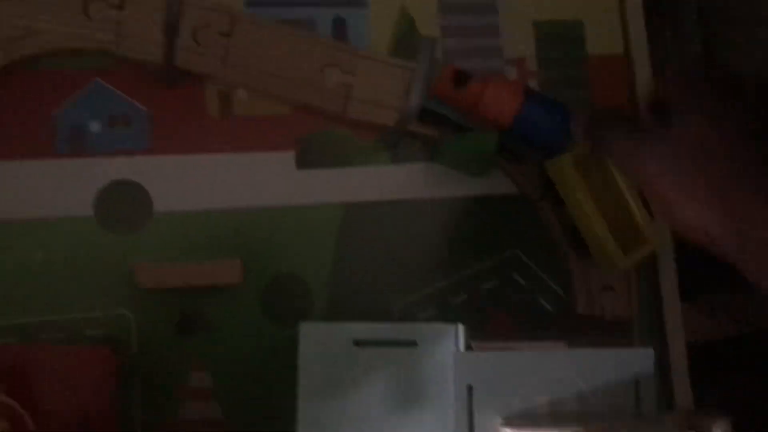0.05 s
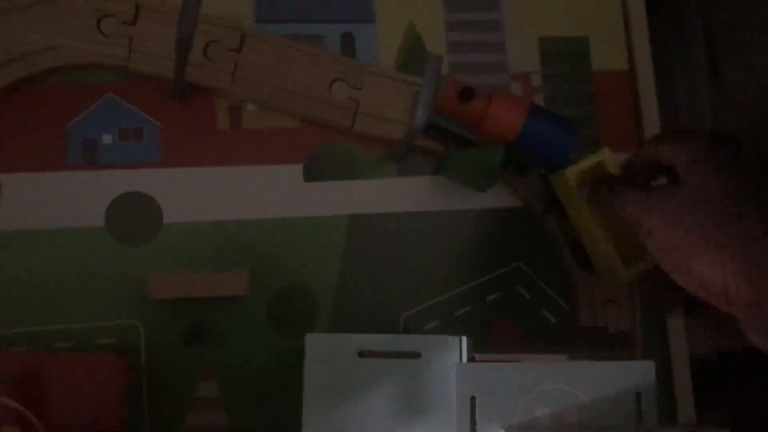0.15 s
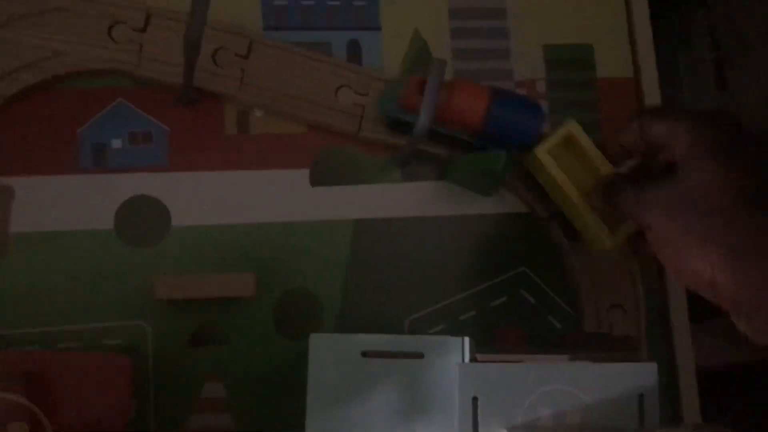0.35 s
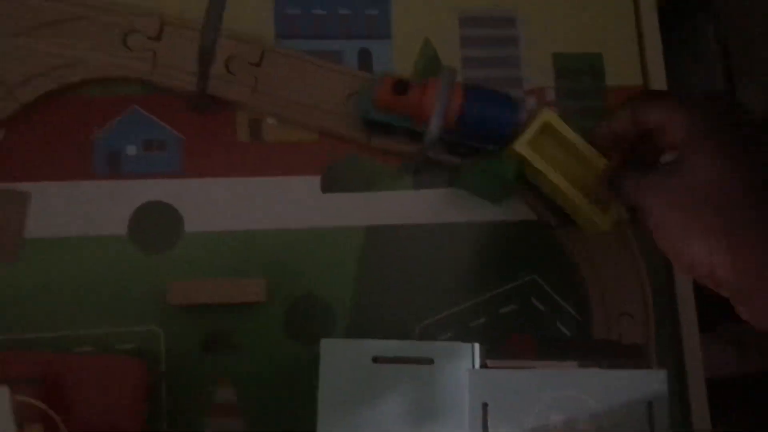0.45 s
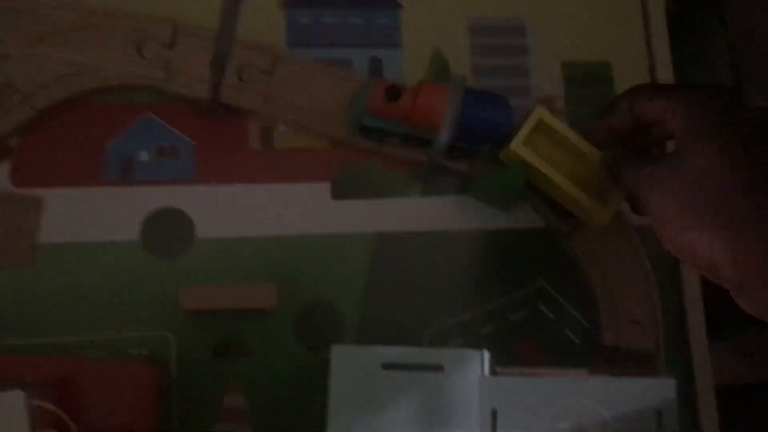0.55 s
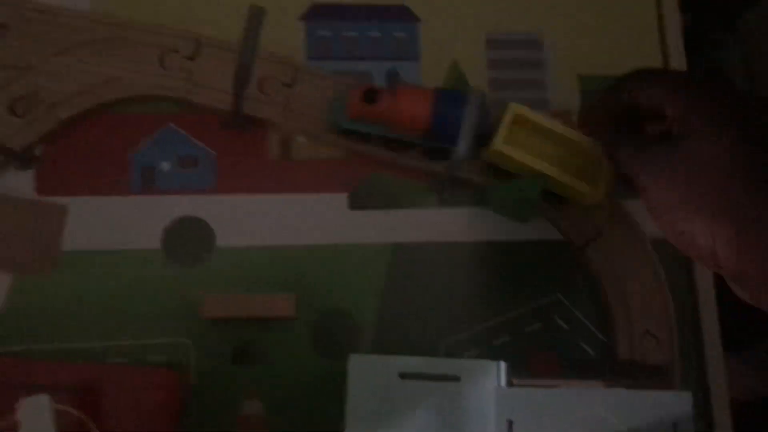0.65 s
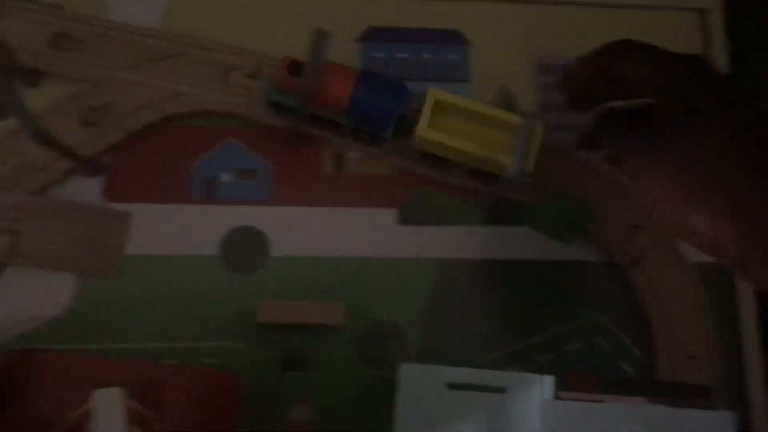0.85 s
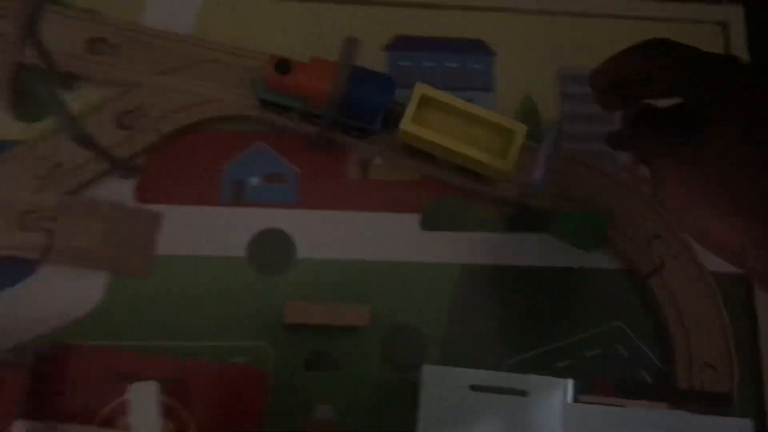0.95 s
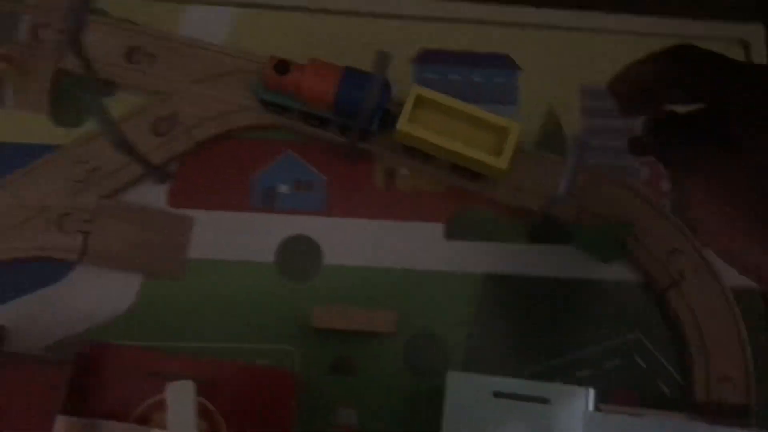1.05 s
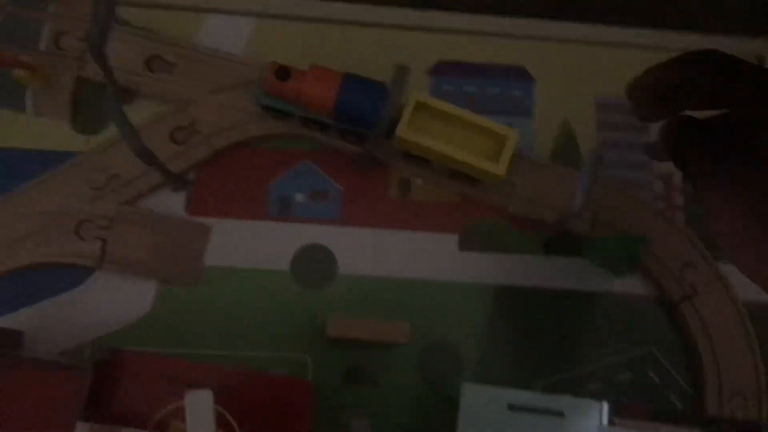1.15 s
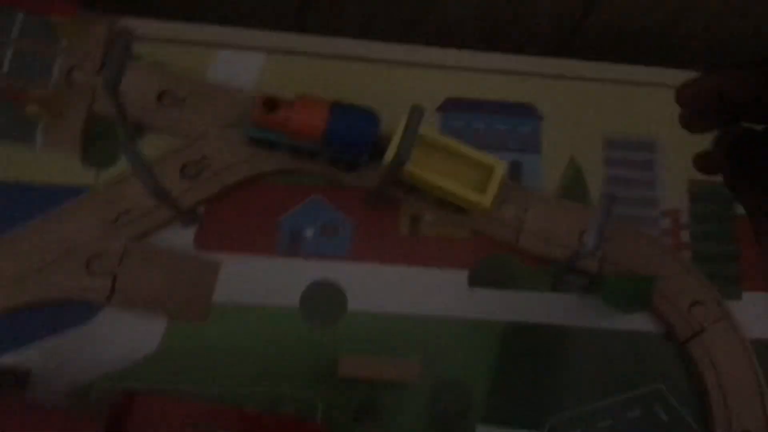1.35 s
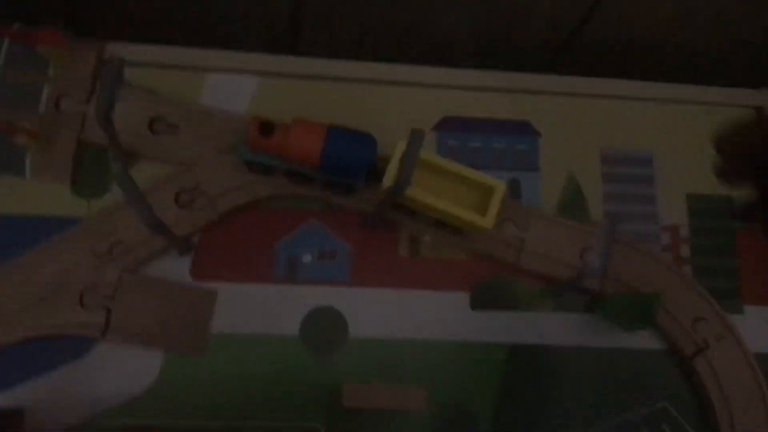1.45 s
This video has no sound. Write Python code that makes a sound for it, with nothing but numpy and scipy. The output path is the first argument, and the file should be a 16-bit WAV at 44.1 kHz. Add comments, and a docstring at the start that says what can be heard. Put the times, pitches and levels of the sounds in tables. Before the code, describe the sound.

A toy train rolls over wooden track in a small quiet room. It starts at 0.2 seconds with a sharp plastic click and a hollow clack, then the wheels rumble and grind softly, knocking again around 0.4. The rolling builds to its loudest clatter of wooden clacks and coupling clicks from 0.7 to 0.95. It coasts more quietly, clacks lightly near 1.25 and fades with a faint tick at 1.45.

```python
"""Toy train on wooden track

A hand pushes a toy engine and its wagon round a bend on a play table, then lets them coast.
Surface roughness excites the wheels, which grind over the grain and make the table top drum.
Impacts at the joints ring the modes of track and table; jerks of the coupling ring the two plastic cars.
A small quiet room adds a short reverberation."""
import sys
import numpy as np
from scipy import signal
from scipy.fft import rfft, irfft
from scipy.io import wavfile
from scipy.ndimage import map_coordinates

SR = 44100
rng = np.random.default_rng(int(sys.argv[2]) if len(sys.argv) > 2 else 0)


def file_out(sig):
    """Save sig as 16-bit WAV at sys.argv[1]."""
    # one column per channel
    cols = np.atleast_2d(sig).T
    # limit, then scale
    lim = np.clip(cols, -1, 1)
    pcm = np.round(lim * 32767).astype(np.int16)
    wavfile.write(sys.argv[1], SR, pcm)


N = 66150
TIME_S = np.arange(N) / SR


def undb(db):
    """Amplitude ratio of a level in decibels."""
    return 10 ** (np.asarray(db) / 20)


def unit_rms(x):
    """Normalisation to a mean power of 1."""
    return x / np.sqrt(np.mean(x ** 2))


def unit_energy(x):
    """Normalisation to a total energy of 1."""
    return x / np.sqrt(np.sum(x ** 2))


def envelope(rows, column=1):
    """Gain over time, interpolated in decibels from one column of a table."""
    rows = np.array(rows)
    return undb(np.interp(TIME_S, rows[:, 0], rows[:, column]))


def decay(t60_s):
    """Exponential damping: 60 dB lost in t60_s."""
    return np.exp(-np.log(1000) * np.arange(4096) / (SR * t60_s))


def low_cut(x, hz):
    """Fourth-order Butterworth high-pass."""
    return signal.sosfilt(signal.butter(4, hz, "high", fs=SR, output="sos"), x)


def colour(x, spectrum, size=4096):
    """Minimum-phase filtering through (frequency_hz, gain_db) points."""
    hz, db = np.array(spectrum).T
    bins_hz = np.maximum(np.arange(size // 2 + 1) * SR / size, 1)
    gain = undb(np.interp(np.log(bins_hz), np.log(hz), db))
    cepstrum = irfft(np.log(gain))
    cepstrum[1:size // 2] *= 2
    cepstrum[size // 2 + 1:] = 0
    return signal.fftconvolve(x, irfft(np.exp(rfft(cepstrum))))[:len(x)]


def ring(modes, detune=.01, scatter_db=0.9):
    """Modal superposition: a struck body sounds as damped sines, slightly different at each blow."""
    out = 0
    for hz, t60_s, db in modes:
        tuning, strength, polarity = rng.standard_normal(3)
        env = decay(t60_s)
        wave = np.sin(2 * np.pi * hz * (1 + detune * tuning) * np.arange(len(env)) / SR)
        out = out + np.sign(polarity) * undb(db + scatter_db * strength) * unit_energy(env * wave)
    return unit_energy(out)


def burst(spectrum, t60_s=0.033, crack_energy=.03):
    """Impact transient: an impulse, then modes so dense that they act as decaying noise."""
    env = decay(t60_s)
    x = unit_energy(env * rng.standard_normal(len(env)))
    x[0] += np.sqrt(crack_energy)
    return unit_energy(colour(x, spectrum))


def add_hit(out, start_s, hit, reference_s=.005):
    """Superposition of one hit, scaled so that its level is its energy spread over reference_s."""
    i = int(start_s * SR)
    out[i:i + len(hit)] += hit[:max(N - i, 0)] * np.sqrt(reference_s * SR)


def bumps(per_s, spread_db):
    """Poisson process: tiny random contacts of uneven strength."""
    contact = rng.random(N) < per_s / SR
    polarity = rng.choice([-1, 1], N)
    return contact * polarity * undb(spread_db * np.minimum(rng.exponential(size=N), 4))


def grains(spectrum):
    """Incoherent summation: the powers of many brief contacts add into a patter of noise."""
    contacts = bumps(per_s=1000, spread_db=3.0)
    power = signal.fftconvolve(contacts ** 2, decay(t60_s=0.0089) ** 2)[:N]
    patter = np.sqrt(np.abs(power)) * rng.standard_normal(N)
    return unit_rms(colour(patter, spectrum))


# Spectrum of the room air: frequency_hz, gain_db
AIR_SPECTRUM = [(20, -13), (55, 3.5), (100, -8.5), (200, -15), (500, -14), (1200, -30), (4000, -28.5),
                (8000, -35.5), (10500, -36.5), (13000, -33), (16000, -42.5)]
# Faint hiss as the cars coast: time_s, level_db
HISS_LEVELS = [(1.05, -94), (1.13, -63), (1.23, -62.5), (1.33, -76), (1.42, -75)]


def background():
    """Filtered noise: a steady floor of room air and a faint passing hiss."""
    air = undb(-61) * unit_rms(colour(rng.standard_normal(N), AIR_SPECTRUM))
    hiss = colour(rng.standard_normal(N), [(1000, -25), (5000, -0.5), (9000, -0.5), (14000, -1.5)])
    return air + unit_rms(hiss) * envelope(HISS_LEVELS)


def room(x, build_s=0.0032, crossover_hz=4000):
    """Diffuse reverberation: reflections build quickly and decay exponentially, weaker in the treble."""
    out, t = x, np.arange(SR // 2) / SR
    for band, t60_s, db in (("low", .19, -11), ("high", .2, -18.5)):
        env = np.exp(-np.log(1000) * t / t60_s) * (1 - np.exp(-t / build_s))
        reflections = unit_energy(env * rng.standard_normal(len(t)))
        tail = signal.lfilter(*signal.butter(2, crossover_hz, band, fs=SR), reflections)
        out = out + undb(db) * signal.fftconvolve(x, tail)[:N]
    return out


# Spectrum of the airy brushing sound: frequency_hz, gain_db
BRUSH_SPECTRUM = [(3000, -18), (7000, -8), (10000, -6), (12500, 3), (16000, -3)]


def brush(start_s=1.4415, t60_s=0.15, level_db=-53.5):
    """Friction noise: a soft, high puff dies away after the last tick."""
    t = TIME_S - start_s
    env = (t > 0) * np.exp(-np.log(1000) * np.abs(t) / t60_s)
    return undb(level_db) * env * unit_rms(colour(rng.standard_normal(N), BRUSH_SPECTRUM))


def scrape(centre_s=0.86, sigma_s=0.026, pitch_hz=14800, bandwidth_hz=400, level_db=-52):
    """Friction drives a narrow resonance: an axle rubs briefly as the wagon rattles over a joint."""
    resonance = signal.iirpeak(pitch_hz, pitch_hz / bandwidth_hz, fs=SR)
    rub = signal.lfilter(*resonance, bumps(per_s=4000, spread_db=2))
    swell = np.exp(-((TIME_S - centre_s) / sigma_s) ** 2 / 2)
    return undb(level_db) * unit_rms(rub) * swell


# Strength of the three rolling noises: time_s, rumble_db, grind_db, rasp_db
ROLL_LEVELS = [(0, -67.5, -71.5, -92), (.18, -68.5, -78, -90), (.205, -42, -50.5, -70),
               (.33, -43.5, -58.5, -70), (.41, -40.5, -54.5, -66.5), (.48, -38.5, -43.5, -48.5),
               (.53, -43, -58.5, -69.5), (.59, -39, -47.5, -58), (.65, -33, -44.5, -50),
               (.70, -35.5, -45, -56), (.76, -34, -39, -46), (.80, -49, -41.5, -48), (.85, -33, -39.5, -47),
               (.93, -33, -45.5, -58), (.99, -37, -50.5, -57), (1.06, -43.5, -68, -74.5),
               (1.10, -40, -49.5, -58.5), (1.15, -44, -71.5, -69), (1.19, -41, -52.5, -60.5),
               (1.22, -44.5, -64, -66), (1.28, -40, -47, -67), (1.35, -55, -73, -73),
               (1.5, -70.5, -68, -78)]
# Spectra of the table's rumble (before its pitch shift) and of the wheels' low grind and fine rasp:
# frequency_hz, gain_db
RUMBLE_SPECTRUM = [(25, -58.5), (65, -18.5), (105, -15), (145, -1), (180, 0), (215, -5.5), (260, -9.5),
                   (320, -15.5), (420, -24), (600, -26.5), (1500, -35.5), (5000, -103)]
GRIND_SPECTRUM = [(40, -38), (150, -14), (330, 0), (560, 3), (950, 0.5), (1400, 2.5), (2000, 0),
                  (2600, -12.5), (4000, -21), (8000, -33)]
RASP_SPECTRUM = [(1000, -29), (2200, -5), (3100, 1), (3700, -1.5), (4400, -8), (6000, -7.5), (7500, -16),
                 (11000, -22.5), (16000, -24)]
# Modes of the table top, also struck by the knocks: frequency_hz, t60_s, relative_db
TABLE_MODES = [(72, .05, -4.5), (131.5, 0.057, -0.5), (181.7, 0.053, 0.5), (245.6, 0.052, -5),
               (322, 0.039, -10.5), (437, 0.01, -20)]


def rolling(unshifted_db=-38, octaves_per_db=0.0487):
    """Roughness excitation: wheels grind over the grain and drum the table, higher when rolling harder."""
    drive = colour(bumps(per_s=1500, spread_db=2.5), RUMBLE_SPECTRUM)
    resonance = signal.fftconvolve(drive, ring(TABLE_MODES))[:N]
    rumble = unit_rms(drive) + undb(-9) * unit_rms(resonance)
    force = envelope(ROLL_LEVELS, column=1)
    pitch_ratio = 2 ** (octaves_per_db * (20 * np.log10(force) - unshifted_db))
    rumble = map_coordinates(rumble, [np.cumsum(pitch_ratio)], order=1, mode="mirror")
    rumble = unit_rms(low_cut(rumble, hz=122)) * force
    grind = grains(GRIND_SPECTRUM) * envelope(ROLL_LEVELS, column=2)
    rasp = grains(RASP_SPECTRUM) * envelope(ROLL_LEVELS, column=3)
    return rumble + grind + rasp


# Jerks of the coupling on each car: start_s, engine_drive_db, wagon_drive_db
COUPLING_JERKS = [(0.069, -58.5, -59), (.2010, -39, -55), (0.2068, -28.5, -30.5), (.2088, -18.5, -52),
                  (.4010, -59.5, -59), (0.43, -57, -43), (.4370, -54, -29.5), (0.4447, -32.5, -26),
                  (.4472, -56, -24.5), (.6055, -66.5, -53), (0.685, -71, -70), (0.7138, -63, -58),
                  (0.7415, -60, -33.5), (.8183, -43, -36), (0.8277, -28, -31), (0.8296, -29.5, -48),
                  (0.8388, -41, -42), (0.854, -41, -38), (.8615, -51, -43), (0.882, -49, -53),
                  (0.8906, -36.5, -29), (.9497, -45, -56.5), (1.2620, -51, -54), (1.2735, -47, -35.5),
                  (1.2848, -49, -52), (1.4417, -54, -55.5)]
# Modes of the two plastic shells: frequency_hz, t60_s, relative_db
ENGINE_MODES = [(2050, 0.043, -5.5), (4160, .016, -7), (5140, 0.006, -8.5), (5530, .012, -4),
                (6046, .015, -1.5), (8670, .011, -9), (10050, .011, 1), (11020, .011, 0.5),
                (11310, .009, 0), (12800, 0.0019, -3), (15000, .008, -6.5)]
WAGON_MODES = [(4750, .02, -8), (4840, .016, -4), (5360, 0.032, -8), (5620, .016, -4), (8330, 0.022, 2),
               (9050, 0.014, 4.5), (9450, .016, 2.5), (11150, .01, -24), (13700, .006, -6),
               (14700, .01, -7)]
# Spectrum of the coupling's snap: frequency_hz, gain_db
SNAP_SPECTRUM = [(500, -5), (2000, -2), (3400, -6), (5500, 7.5), (7300, -0.5), (10000, -2), (12500, -1),
                 (16000, -12)]


def coupling_clicks(shell_gain_db=-5, snap_gain_db=-8.5):
    """Free vibration after an impulse: the coupling snaps and both plastic shells ring."""
    out = np.zeros(N)
    for start_s, engine_drive_db, wagon_drive_db in COUPLING_JERKS:
        engine, wagon = undb(engine_drive_db), undb(wagon_drive_db)
        shells = engine * ring(ENGINE_MODES) + wagon * ring(WAGON_MODES)
        snap = np.hypot(engine, wagon) * burst(SNAP_SPECTRUM)
        add_hit(out, start_s, undb(shell_gain_db) * shells + undb(snap_gain_db) * snap)
    return out


# Wheel impacts, each with the hollow note of the struck spot; levels are before the low cut:
# start_s, clack_db, cutoff_hz, note_hz, note_over_clack_db, thud_db
WHEEL_IMPACTS = [(0.1944, -40.5, 1800, 1390, 2.5, -58), (0.2058, -37.5, 2980, 2230, 11, -52),
                 (0.2353, -43, 2020, 1490, -1, -41), (0.3772, -52, 1500, 1420, 8, -41),
                 (0.4011, -38, 1820, 1460, 6.5, -49), (0.4259, -40, 2200, 1930, 5, -61),
                 (0.4297, -35.5, 3040, 2070, 2, -34.5), (0.4382, -33.5, 3020, 1930, -11, -43),
                 (0.4887, -43, 4000, 2090, -7, -32.5), (0.559, -39.5, 2000, 1980, 7, -50),
                 (0.622, -41.5, 2300, 1890, -11, -37.5), (0.6465, -36.5, 3540, 4500, -5, -36),
                 (0.6841, -42.5, 6140, 4500, -3, -61), (0.7159, -33.5, 8100, 5360, 0.5, -35),
                 (0.7174, -26, 1800, 1496, 1, -24), (0.7407, -37, 5050, 3000, -25, -41),
                 (0.7803, -30.5, 4600, 3190, -2.5, -27.5), (0.818, -26.5, 5040, 1990, 2, -22),
                 (0.8251, -25.5, 8000, 2880, -23, -28), (0.8301, -28, 4970, 3000, -3, -37),
                 (0.8407, -36.5, 7000, 4400, -5, -36), (0.8516, -28.5, 6000, 2740, 6, -30),
                 (0.8624, -26.5, 5000, 4340, -3.5, -51), (0.8808, -26, 3460, 1710, 0, -33.5),
                 (0.892, -19.5, 4900, 2203, 0, -51), (.8955, -26, 6000, 4210, -4, -55),
                 (0.914, -31, 2400, 2360, -5, -41), (0.9636, -36, 3970, 2960, -6, -32),
                 (1.091, -53.5, 4000, 3460, 8, -59), (1.1707, -56, 3000, 1780, -21, -52),
                 (1.2308, -47, 2010, 1790, 2, -38), (1.2362, -38.5, 1430, 950, -10, -39),
                 (1.2488, -46, 2200, 1870, -9, -34), (1.2638, -47.5, 4950, 4530, -17, -70),
                 (1.2739, -33.5, 6100, 4500, -4.5, -53), (1.2796, -33.5, 2580, 394, 6, -41)]
# Modes of the wooden track: frequency_hz, t60_s, relative_db
TRACK_MODES = [(550, 0.038, -2.5), (1350, 0.022, -3.5), (1626, 0.013, 1), (1815, 0.015, 5.5),
               (2046, 0.025, -5.5), (2354, 0.019, -15), (2920, .025, 2), (3285, 0.014, -6),
               (4346, 0.014, 4)]
# Spectrum of the wooden clack: frequency_hz, gain_db
CLACK_SPECTRUM = [(100, -12), (300, -7), (600, 3.5), (950, -2.5), (1800, 0.5), (3500, 2), (5500, -2),
                  (7500, -2), (11000, -14.5), (16000, -10.5)]


def joint_knocks(note_t60_s=0.017):
    """Impact excitation: wheels drop into joints, the track clacks hollowly and the table thuds."""
    out = np.zeros(N)
    for start_s, clack_db, cutoff_hz, note_hz, note_over_clack_db, thud_db in WHEEL_IMPACTS:
        wood = undb(-1) * burst(CLACK_SPECTRUM) + undb(-5.5) * ring(TRACK_MODES)
        wood = unit_energy(signal.lfilter(*signal.butter(2, cutoff_hz, fs=SR), wood))
        note = undb(note_over_clack_db) * ring([(note_hz, note_t60_s, 0)])
        clack = undb(clack_db) * unit_energy(wood + note)
        thud = undb(thud_db) * ring(TABLE_MODES, detune=.05, scatter_db=1.5)
        # Only heavy knocks reach the table's deepest mode.
        low_cut_hz = np.interp(thud_db, [-34, -26.5], [133, 73])
        add_hit(out, start_s, low_cut(clack + thud, low_cut_hz))
    return out


def scene():
    """Linear superposition: the train and its reverberation over the background, in one channel."""
    train = joint_knocks() + coupling_clicks() + rolling() + scrape() + brush()
    return (room(train) + background())[None]


def record(dry):
    """Band limiting: a steep elliptic low-pass at 15.9 kHz."""
    return signal.sosfilt(signal.ellip(10, .2, 80, 15900, fs=SR, output="sos"), dry)


dry = scene()
out = record(dry)
file_out(out)
```